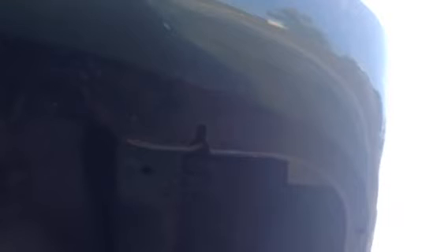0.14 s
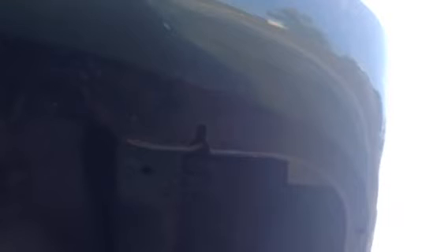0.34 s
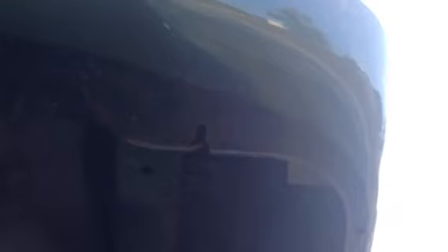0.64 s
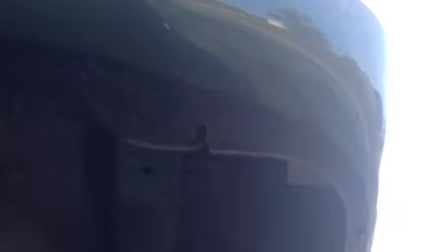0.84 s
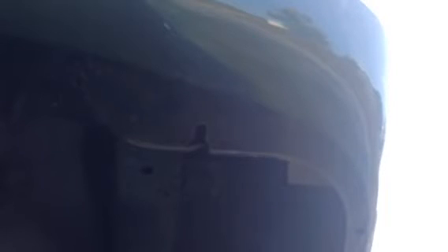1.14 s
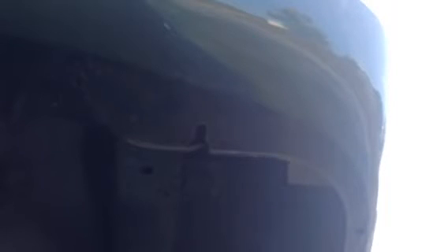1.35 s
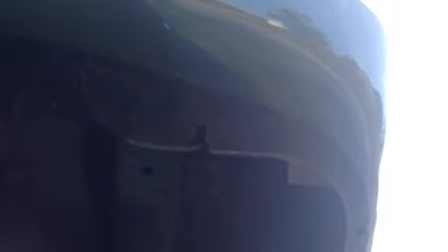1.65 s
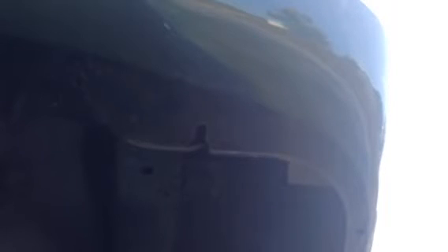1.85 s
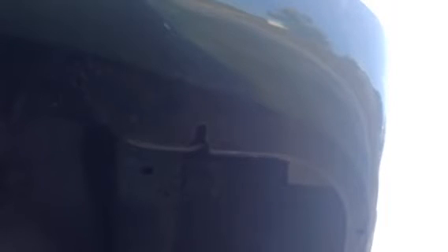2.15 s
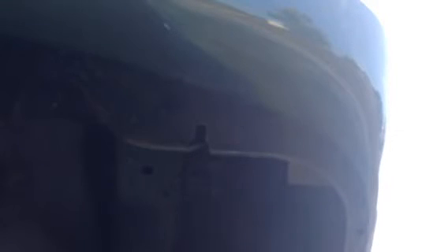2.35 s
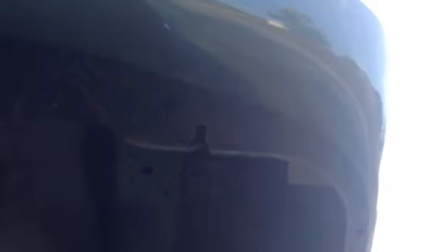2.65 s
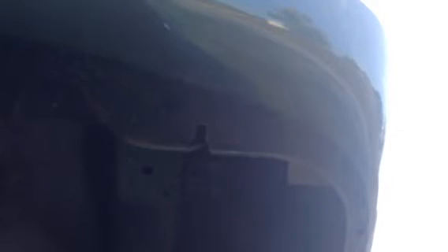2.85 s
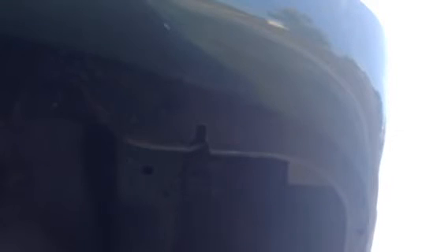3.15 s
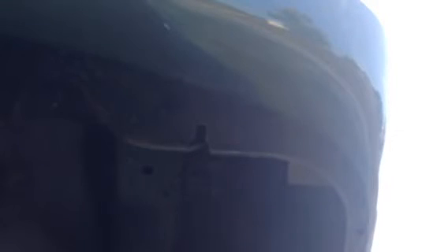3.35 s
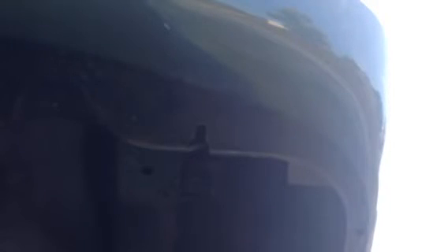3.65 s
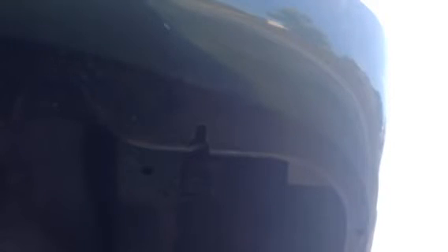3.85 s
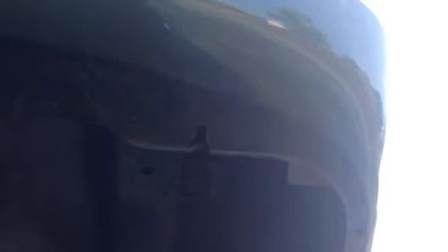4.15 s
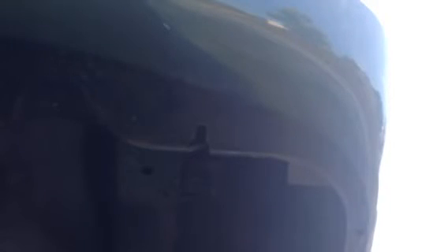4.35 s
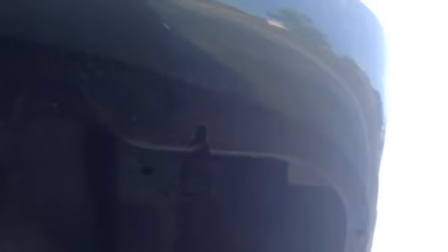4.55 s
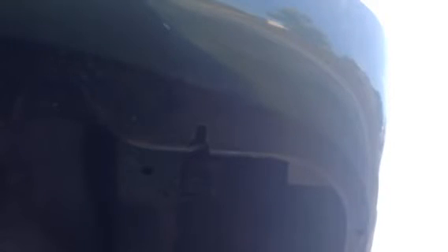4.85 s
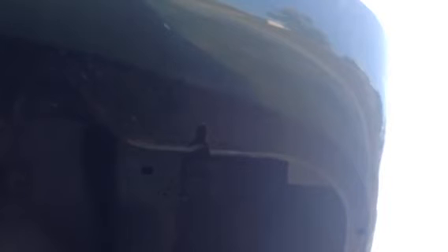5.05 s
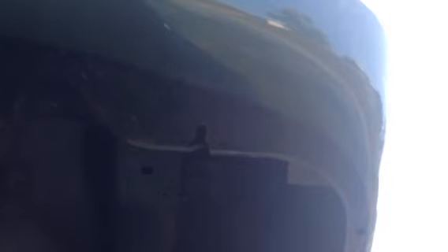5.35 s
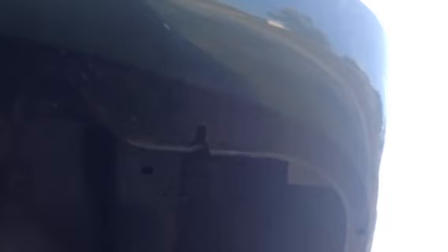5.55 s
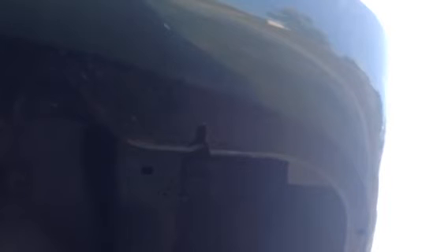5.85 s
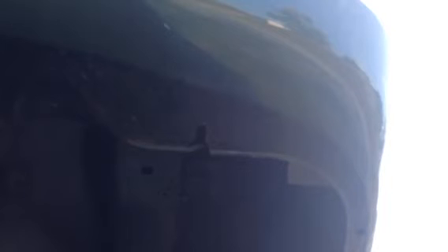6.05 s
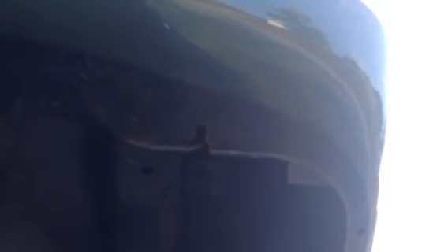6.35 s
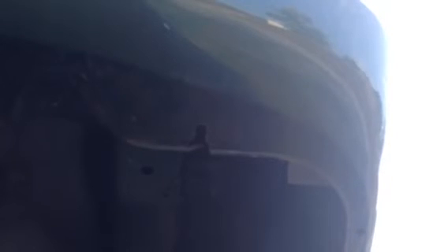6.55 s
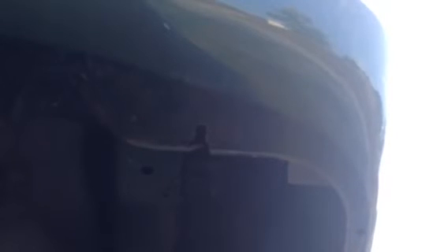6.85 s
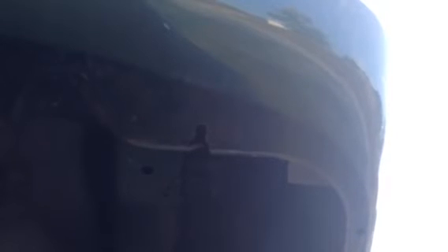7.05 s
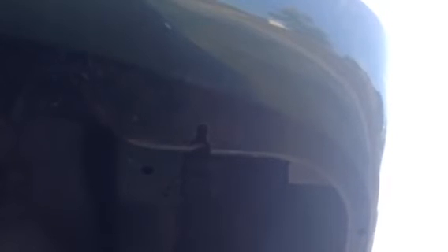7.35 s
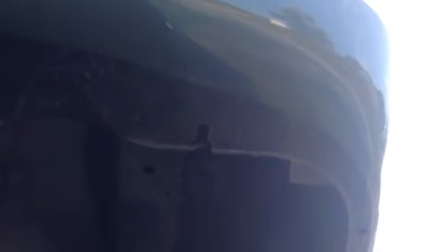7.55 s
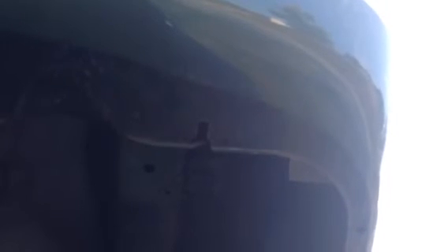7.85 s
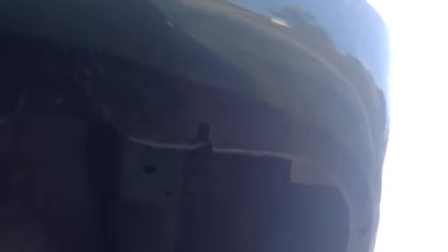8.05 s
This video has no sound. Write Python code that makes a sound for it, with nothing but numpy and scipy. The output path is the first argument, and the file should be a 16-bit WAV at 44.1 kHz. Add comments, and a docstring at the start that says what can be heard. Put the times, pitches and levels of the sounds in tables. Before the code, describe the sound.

Raw open exhaust up close outdoors: fast start drops to rough idle, two barking revs burble and pop downward, engine dies with puffs and metal ticks.

```python
"""A four-cylinder car with no muffler, heard beside the tailpipe outdoors: it settles to idle, is revved twice, stops.
Each firing sends a pressure pulse that booms in the open pipe; under throttle, shocked bursts of filtered
noise rasp over it, and off throttle they burble. Unburnt charge pops, and runs of hard firings bark.
Noise gated by the firings makes the rumble and hiss of the gas. The last turns bark and puff, then the hot metal
rings, ticks and creaks. Behind it lie a low outdoor rumble and a faint fluttering electrical whine."""
import sys
import numpy as np
from scipy import signal
from scipy.fft import rfft, irfft
from scipy.io import wavfile
from scipy.ndimage import uniform_filter1d

SR = 44100
rng = np.random.default_rng(int(sys.argv[2]) if len(sys.argv) > 2 else 0)


def dump_mix(stems):
    """Bounce the given channels to the path in sys.argv[1] as a 16-bit WAV at rate SR."""
    frames = np.atleast_2d(stems).T  # one column per channel
    limited = np.clip(frames, -1, 1)  # hard clip at full scale
    pcm = np.round(limited * 32767).astype(np.int16)
    wavfile.write(sys.argv[1], SR, pcm)


N = 361179
TIME = np.arange(N) / SR
TOP_HZ = 15380  # upper edge of the microphone's passband

# spectrum of the outdoor rumble: f/Hz, relative level/dB
OUTDOOR_SPECTRUM = [(20, -27.5), (45, -9), (78, -1), (115, 1.5), (180, -7), (300, -16), (430, -11),
                    (700, -41.5), (1500, -25), (3000, -39.5), (7000, -30.5), (15000, -38)]

# soft puffs as the crank rocks to rest and pushes air out: t/s, level/dB
PUFFS = [(7.135, -19), (7.217, -18), (7.323, -25), (7.367, -36)]
# spectrum of one puff: f/Hz, relative level/dB
PUFF_SPECTRUM = [(25, -31), (55, -4), (78, 12.5), (130, 1.0), (190, -3.0), (300, -34), (900, -57), (3000, -85)]
# resonances of the ringing metal: f/Hz, bandwidth/Hz, level before the envelope/dB
METAL_MODES = [(2290, 27, -74), (2430, 42, -79), (3780, 100, -73.5), (4570, 90, -78)]
# envelope of the ringing: t/s, gain/dB
RINGING_ENVELOPE = [(7.0, -13), (7.2, 4), (7.5, 7.5), (7.7, 3), (8.1, -26)]
# small metal ticks: t/s, relative level/dB
TICKS = [(7.313, -46), (7.377, -57), (7.499, -53.5), (7.568, -63), (7.645, -68), (7.817, -53.5),
         (7.862, -60), (8.053, -56.5)]
# spectrum of a tick: f/Hz, relative level/dB
TICK_SPECTRUM = [(200, 16.5), (1200, 4.0), (4000, -0.5), (8000, -6.0), (15000, -24)]
# envelope of the creak: t/s, level/dB
CREAK_ENVELOPE = [(7.55, -120), (7.57, -66), (7.59, -60), (7.63, -120)]

# spectrum of the gas hiss: f/Hz, relative level/dB
HISS_SPECTRUM = [(290, -22.5), (500, 1.5), (585, -3), (777, 0), (871, -6.5), (1450, -0.5), (1910, -3.5),
                 (2530, -4), (2760, -6.5), (4230, -8), (5620, -11), (6390, -15.5), (8020, -18), (8730, -21),
                 (15000, -35)]
# spectrum of the low rush of gas inside the pipe: f/Hz, relative level/dB
FLOW_SPECTRUM = [(40, -8.5), (85, -5), (130, -1), (190, -5.5), (250, 6.5), (300, -6.5), (365, 0.5),
                 (420, -10), (455, -7.5), (520, -29.5), (800, -30), (2500, -71.5)]
# higher resonances of the bare pipe: f/Hz, bandwidth/Hz, level relative to the direct sound/dB
PIPE_MODES = [(452, 20, 1), (764, 12, -12.5), (1130, 51, -7), (1380, 11, -6.5), (1490, 16, -16.5),
              (2083, 23, -4.5), (2800, 23, 4), (3154, 19, -7.5), (5900, 310, -14)]

# lone pops off throttle: t/s, hollow body level/dB, relative crack level/dB
POPS = [(2.303, -16.5, -31), (2.316, -23, -27), (2.332, -15.5, -30.5), (2.468, -13.5, -29),
        (2.774, -20.5, -46), (2.789, -26, -48), (2.83, -30, -54), (4.650, -19.5, -32), (6.473, -35, -32)]
# runs of barking firings: hardest t/s, build-up/s, die-down/s, body level/dB, relative crack level/dB
BARKS = [(1.851, 0.063, 0.24, -14, -19.5), (3.958, 0.046, 0.22, -14, -17.5),
         (6.981, 0.24, 0.19, -11.5, -18)]
# spectrum of the tearing crack at the pipe mouth: f/Hz, relative level/dB
CRACK_SPECTRUM = [(200, -26), (500, 1.5), (750, 10.5), (900, 4), (1120, -0.5), (1400, -3), (2200, -4),
                  (3100, -11.5), (3900, -17.5), (7000, -22), (10000, -29.5), (15000, -36)]
# spectrum of the hollow ring of the pipe: f/Hz, relative level/dB
HOLLOW_SPECTRUM = [(90, -16.5), (240, 4.5), (360, 0.5), (450, -5.5), (540, -2), (640, -5), (745, -2),
                   (880, -12.5), (1500, -22.5), (3000, -32), (9000, -70)]

# one exhaust pulse, throttle shut: f/Hz, relative level/dB
COAST_PULSE = [(20, -39), (42, -21.5), (58, -4), (72, 1.5), (85, 4), (102, -3), (125, -7), (168, -3.5),
               (200, -12.5), (235, -18.5), (370, -30.5), (520, -62), (900, -56.5), (2500, -82)]
# one exhaust pulse, throttle open: f/Hz, relative level/dB
LOAD_PULSE = [(20, -30), (42, -26.5), (58, -13.5), (72, 0), (90, 4.5), (130, 3), (175, 2), (220, -3.5),
              (300, -23), (420, -40.5), (800, -53), (2500, -87.5)]
# spectrum of the turbulence after each pulse: f/Hz, relative level/dB
CHURN_SPECTRUM = [(20, -6.5), (70, -8.0), (190, 12.5), (270, -8), (390, -17), (520, -40.5), (1200, -58.5)]
# inequality of the four cylinders before scaling by roughness: level/dB
CYLINDERS_DB = (-1.5, -4.0, 1.5, 2.5)

# firing rate while the engine settles: t/s, f/Hz
SETTLE = [(0.0, 45.38), (0.345, 40.86), (1.099, 27.08), (1.47, 26.07)]
# firing rate in the first rev and its coast: t/s, f/Hz
FIRST_REV = [(1.781, 27.02), (2.0, 51.84), (2.095, 69.08), (2.189, 78.06), (2.556, 65.28), (3.11, 45.31),
             (3.551, 34.33)]
# firing rate in the second rev and its coast: t/s, f/Hz
SECOND_REV = [(3.86, 26.15), (4.116, 50.18), (4.225, 79.68), (4.381, 98.67), (4.729, 88.16), (5.384, 61.23),
              (5.929, 40.73)]
# firing rate as the engine dies: t/s, f/Hz
STALL = [(6.34, 37.94), (6.787, 25.84), (7.083, 17.08), (7.18, 11.95)]
IDLE_HZ, STOP_S = 26, 7.18

# blips of the pedal: pressed t/s, eased t/s, closing t/s, relative rasp level/dB,
# change of coasting pulses from the press on/dB, change of hiss from the press on/dB
REVS = [(1.749, 2.02, 2.21, -34, 2.5, 0), (3.889, 4.231, 4.34, -31, 6, 2)]
OPEN_S, SHUT_S = 0.025, 0.11  # the throttle opens at once and shuts more slowly

# fuel burning in the pipe: start t/s, end t/s, extra boom/dB, relative burble level/dB, extra roughness
AFTERBURNS = [(2.315, 2.484, 4.5, -39.5, 0.31), (2.735, 2.794, 7, -44, 0.25),
              (4.474, 4.732, 1.5, -37.5, 0.29), (6.435, 6.634, 4.5, -50, 0.1)]
AFTERBURN_RISE_S, AFTERBURN_FALL_S = 0.019, 0.053
# weak firings: start t/s, end t/s, change of level/dB
WEAK_FIRINGS = [(2.47, 2.534, -14.5), (2.802, 2.835, -11)]

# pulse strength at idle and under load, its sag once the foot eases, and its drop before the stop
IDLE_DB, PULSE_DB_PER_OCTAVE, LOAD_DB, SAG_DB_PER_S = -15, 0.6, -2, 34
DYING_S, DYING_DB = 0.2, -9.5
# coasting pulses firm up and even out near one firing rate
FIRM_HZ, FIRM_OCTAVES, FIRM_DB, FIRM_EVENNESS = 46.75, 0.2, 5, 0.8
# combustion is lumpy at idle, smoother at speed and under load
IDLE_ROUGH, ROUGH_PER_OCTAVE, LOAD_ROUGH = 0.67, 0.28, 0.33


def undb(db):
    """Amplitude ratio: 20 dB is a factor of ten."""
    return 10 ** (np.asarray(db) / 20)


def curve(rows, at=TIME):
    """Linear interpolation: (t, value) rows are joined by straight lines."""
    return np.interp(at, *np.transpose(rows))


def unit(x):
    """Normalisation: the rms becomes 1."""
    return x / np.sqrt(np.mean(x ** 2))


def noise():
    """White noise: equal mean power at every frequency, for the whole scene."""
    return rng.standard_normal(N)


def response(points, causal=1, size=8192):
    """Cepstral phase: the spectrum gives a minimum-phase impulse response, peak 1; causal < 1 lets it pre-swell."""
    hz, db = np.transpose(points)
    bins_hz = np.arange(size // 2 + 1) * SR / size
    level_db = np.interp(np.log(bins_hz + 1), np.log(hz), db)
    cepstrum = irfft(np.log(undb(level_db)))
    cepstrum[1:size // 2] *= 1 + causal
    cepstrum[size // 2 + 1:] *= 1 - causal
    h = irfft(np.exp(rfft(cepstrum)))
    return h / np.abs(h).max()


def through(x, h):
    """Linear system: the output is the input convolved with the impulse response."""
    return signal.fftconvolve(x, h)[:N]


def coloured(x, points):
    """Spectral shaping with unit-energy response, so that white noise keeps its level."""
    h = response(points)
    return through(x, h / np.sqrt(np.sum(h ** 2)))


def band(x, hz, width):
    """Single resonance: gain 1 at its centre."""
    return signal.lfilter(*signal.iirpeak(hz, hz / width, fs=SR), x)


def strikes(times, sizes):
    """Impulsive excitation: one sample of the given size at each given time."""
    return np.bincount(np.clip(np.asarray(times) * SR, 0, N - 1).astype(int), sizes, N)


def fade(x, decay_s):
    """Exponential relaxation: every impulse dies away."""
    return signal.lfilter([1], [1, -np.exp(-1 / (decay_s * SR))], x)


def swell(x, decay_s, rise_s=0.0034):
    """Two relaxations in series: every impulse becomes a puff that rises quickly and dies away."""
    return fade(fade(x, decay_s), rise_s) / (rise_s * SR)


def thumps(times, sizes, colour, abrupt=0.74):
    """Gradual valve opening: pressure pulses swell and are timed by their deepest swing."""
    h = response(colour, abrupt)
    h = np.roll(h, len(h) // 8)  # room for the swell ahead of the peak
    return through(strikes(times - np.argmin(h) / SR, sizes), h)


def pipe(x):
    """Pipe resonance: narrow modes add to whatever rushes through the bare pipe."""
    return x + sum(undb(db) * band(x, hz, width) for hz, width, db in PIPE_MODES)


def ramp(at, start, length_s):
    """Linear onset: from 0 to 1 in a straight line."""
    return np.clip((at - start) / length_s, 0, 1)


def spell(at, start, end, rise_s, fall_s):
    """Trapezoidal envelope: attack, hold, release."""
    return ramp(at, start, rise_s) * (1 - ramp(at, end, fall_s))


def speed(at):
    """Firing frequency: engine speed in firings per second."""
    return curve(np.vstack([SETTLE, FIRST_REV, SECOND_REV, STALL]), at)


def octaves(at):
    """Logarithmic frequency: engine speed in octaves above idle."""
    return np.log2(speed(at) / IDLE_HZ)


def firings():
    """Phase accumulation: an exhaust valve opens at each whole count of the integrated firing rate."""
    count = np.cumsum(speed(TIME)) / SR + 0.2
    times = np.interp(np.arange(1, int(count[-1])), count, TIME)
    return times[times < STOP_S]


def opening(at, pressed, closing):
    """Throttle envelope: opening (0-1) in one blip."""
    return spell(at, pressed, closing, OPEN_S, SHUT_S)


def throttle(at):
    """Superposed envelopes: throttle opening (0-1) over all blips."""
    return sum(opening(at, pressed, closing) for pressed, _, closing, *_ in REVS)


def since_rev(at, values):
    """Stepwise state: the value of the latest blip, 0 before the first."""
    return np.append(0, values)[np.searchsorted([row[0] for row in REVS], at)]


def afterburns(at):
    """Combustion envelopes: how far each spell is alight (0-1), one row per spell."""
    return np.array([spell(at, start, end, AFTERBURN_RISE_S, AFTERBURN_FALL_S)
                     for start, end, *_ in AFTERBURNS])


def firmness(at):
    """Bell curve in log frequency: nearness (0-1) to the rate where pulses firm up."""
    return np.exp(-(np.log2(speed(at) / FIRM_HZ) / FIRM_OCTAVES) ** 2)


def roughness(at):
    """Cyclic variation: combustion is less even at low speed and while fuel burns in the pipe."""
    coasting = np.clip(IDLE_ROUGH - ROUGH_PER_OCTAVE * octaves(at), 0, 1)
    coasting *= 1 - FIRM_EVENNESS * firmness(at)
    coasting += np.array(AFTERBURNS)[:, 4] @ afterburns(at)
    return coasting + throttle(at) * (LOAD_ROUGH - coasting)


def draining(stopped_db=-7, stopping_s=0.08, drain_db_per_s=30):
    """Pressure release: gas flow (dB) drops with the last turn and drains away."""
    drop = stopped_db * ramp(TIME, STOP_S - stopping_s, stopping_s)
    return drop - drain_db_per_s * np.maximum(TIME - STOP_S, 0)


def background(floor_db=-56, whine_hz=7950, whine_db=-73, flutter_hz=31.0):
    """Filtered noise and amplitude modulation: a low outdoor rumble and a faint electrical whine that flutters."""
    rumble = unit(through(noise(), response(OUTDOOR_SPECTRUM)))
    flutter = np.maximum(np.sin(2 * np.pi * flutter_hz * TIME), 0) ** 2
    whine = unit(band(band(noise(), whine_hz, 350), whine_hz, 350) * flutter)
    return undb(floor_db) * rumble + undb(whine_db) * whine


def wind_down():
    """Displaced air and excited metal modes: last soft puffs, ringing, ticks and one short creak."""
    times, db = np.transpose(PUFFS)
    puffs = thumps(times, undb(db), PUFF_SPECTRUM)
    ringing = sum(undb(db) * unit(band(noise(), hz, width)) for hz, width, db in METAL_MODES)
    ringing = ringing * undb(curve(RINGING_ENVELOPE))
    times, db = np.transpose(TICKS)
    ticks = swell(strikes(times, undb(db)), 0.061) * coloured(noise(), TICK_SPECTRUM)
    creak = unit(band(band(noise(), 1850, 400), 1850, 400)) * undb(curve(CREAK_ENVELOPE))
    return puffs + ringing + undb(-0.5) * ticks + creak


def gas_level(idle_db=-47.5, db_per_octave=3.5, choke_db=-9, refill_s=1.0, stall_db=4, stall_s=0.45):
    """Flow noise: level (dB) follows speed, is choked when the foot eases and swells as the engine dies."""
    db = idle_db + db_per_octave * octaves(TIME) + since_rev(TIME, [row[5] for row in REVS])
    for _, eased, *_ in REVS:
        refilling = np.exp(-np.maximum(TIME - eased, 0) / refill_s)
        db += choke_db * ramp(TIME, eased, OPEN_S) * refilling
    return db + stall_db * ramp(TIME, STOP_S - stall_s, stall_s / 2) + draining()


def hiss(times, pulsing=0.67):
    """Jet noise: gas streams from the pipe, a little stronger after every firing."""
    gate = 1 + pulsing * fade(strikes(times, np.ones(len(times))), 0.014)
    stream = pipe(through(noise() * gate, response(HISS_SPECTRUM)))
    return unit(stream) * undb(gas_level())


def flow(times, booming, flow_db=-37.0, db_per_octave=5, pulsing=0.15, follow=0.093):
    """Turbulent pipe flow: gas rumbles between firings, rising with speed and a little with the boom."""
    gate = 1 + pulsing * fade(strikes(times, np.ones(len(times))), 0.016)
    boom_power = uniform_filter1d(booming ** 2, size=4400)  # about 0.1 s
    boom_db = 10 * np.log10(np.abs(boom_power) + undb(-62.5) ** 2)
    level_db = flow_db + db_per_octave * octaves(TIME) + follow * boom_db + draining()
    return unit(coloured(noise() * gate, FLOW_SPECTRUM)) * undb(level_db)


def pops(rows, shock=2.5, rise_s=0.0016, body_s=0.0045, crack_s=0.006, tail_s=0.032, tail_db=-19, crack_db=-1):
    """Explosive excitation: unburnt charge makes a hollow ring, a crack and a short slap from the underbody."""
    times, hollow, sharp = np.transpose(rows)
    body, crack = strikes(times, undb(hollow)), strikes(times, undb(sharp + crack_db))
    front = shock * strikes(times + 0.00178, undb(hollow))
    ring = coloured(front + noise() * swell(body, body_s, rise_s), HOLLOW_SPECTRUM)
    snap_envelope = swell(crack, crack_s, rise_s) + undb(tail_db) * swell(crack, tail_s)
    snap = coloured(noise() * snap_envelope, CRACK_SPECTRUM)
    return pipe(ring + snap)


def barks(times, edge_db=-18, weak_db=-4.0):
    """Alternating firing strength: runs of (t, body dB, crack dB) build and die, every second firing weaker."""
    rows = []
    for hardest, build_s, die_s, body_db, crack_db in BARKS:
        away = (times - hardest) / np.where(times < hardest, build_s, die_s)
        weak = (np.arange(len(times)) - np.argmin(np.abs(times - hardest))) % 2
        db = edge_db * away ** 2 + weak_db * weak
        rows.append(np.transpose([times, body_db + db, crack_db + db])[np.abs(away) < 2])
    return np.vstack(rows)


def rasp_strength(idle_db=-69, db_per_octave=15, build_s=0.018, load_db_per_octave=7, sag_db_per_s=200):
    """Power addition: rasp grows steeply with speed and flares under load and while fuel burns in the pipe."""
    rise = octaves(TIME)
    coasting = undb(idle_db + db_per_octave * rise)
    loaded = sum(ramp(TIME, pressed + OPEN_S, build_s) * undb(db - sag_db_per_s * np.maximum(TIME - eased, 0))
                 for pressed, eased, _, db, *_ in REVS)
    loaded = loaded * undb(load_db_per_octave * (rise - 0.5))
    burning = undb(np.array(AFTERBURNS)[:, 3]) @ afterburns(TIME)
    return np.sqrt(coasting ** 2 + loaded ** 2 + burning ** 2)


def rasp(times, decay_s=0.0077, steady=0.52, shock=4.4, scatter_db=6.0):
    """Wave steepening: pulses end in a shock and turbulence, tearing on throttle over a hollow burble."""
    kicks = strikes(times, undb(scatter_db * rng.standard_normal(len(times))))
    bursts = noise() * (steady + swell(kicks, decay_s)) + shock * kicks
    tearing = unit(pipe(coloured(bursts, CRACK_SPECTRUM)))
    burble = unit(pipe(coloured(bursts, HOLLOW_SPECTRUM)))
    return (throttle(TIME) * undb(-2.5) * tearing + undb(0.5) * burble) * rasp_strength()


def coast_strength(at):
    """Pulse amplitude with the throttle shut: decibel changes add, and the opening throttle fades it out."""
    db = IDLE_DB + PULSE_DB_PER_OCTAVE * octaves(at) + FIRM_DB * firmness(at)
    db += DYING_DB * ramp(at, STOP_S - DYING_S, DYING_S)
    db += since_rev(at, [row[4] for row in REVS]) + np.array(AFTERBURNS)[:, 2] @ afterburns(at)
    db += sum(drop * ((at > start) & (at < end)) for start, end, drop in WEAK_FIRINGS)
    return undb(db) * (1 - throttle(at))


def load_strength(at):
    """Pulse amplitude with the throttle open: full until the foot eases, then an exponential sag."""
    return sum(opening(at, pressed, closing) * undb(LOAD_DB - SAG_DB_PER_S * np.maximum(at - eased, 0))
               for pressed, eased, closing, *_ in REVS)


def boom(times, scatter_db=4.0, jitter_s=0.00055, lead_s=0.005, lead_cycles=0.311, churn_db=-24):
    """Pulse radiation: uneven firings boom in the pipe; under load the pressure peaks earlier and fuller."""
    chance = rng.standard_normal((len(times), 2)).T
    rough = roughness(times)
    sizes = undb(rough * (np.resize(CYLINDERS_DB, len(times)) + scatter_db * chance[0]))
    coast, load = sizes * coast_strength(times), sizes * load_strength(times)
    times = times + jitter_s * rough * chance[1]
    early = times - np.minimum(lead_s, lead_cycles / speed(times))
    wave = thumps(times, coast, COAST_PULSE) + thumps(early, load, LOAD_PULSE)
    # turbulence after each pulse makes no two alike
    eddies = noise() * fade(strikes(early, coast + load), 0.1)
    churn = unit(coloured(eddies, CHURN_SPECTRUM))
    return wave + undb(churn_db) * roughness(TIME) * churn


def scene():
    """Superposition: the pressures of all sources add at the one microphone."""
    times = firings()
    booming = boom(times)
    gas = flow(times, booming) + hiss(times)
    bangs = pops(np.vstack([barks(times), POPS]))
    exhaust = booming + gas + rasp(times) + bangs
    return (exhaust + wind_down() + background())[None]


def record(dry, ceiling=0.72):
    """Saturation and band limit: the microphone rounds off the biggest pulses; the top is cut."""
    rounded = dry / (1 + (dry / ceiling) ** 6) ** (1 / 6)
    return signal.sosfilt(signal.ellip(10, 0.2, 80, TOP_HZ, fs=SR, output="sos"), rounded)


dry = scene()
out = record(dry)
dump_mix(out)
```